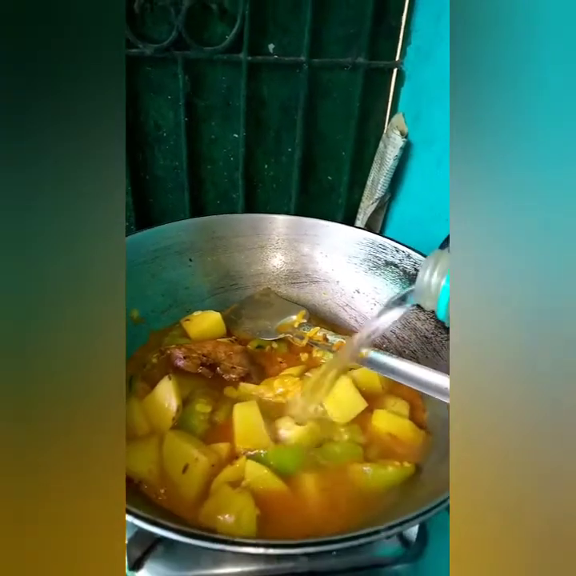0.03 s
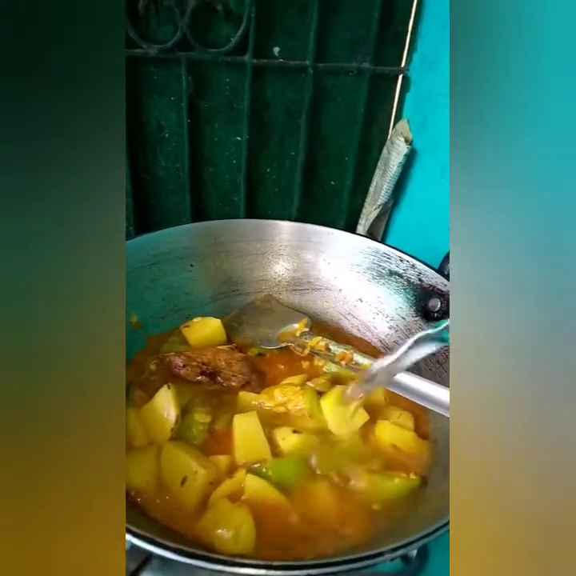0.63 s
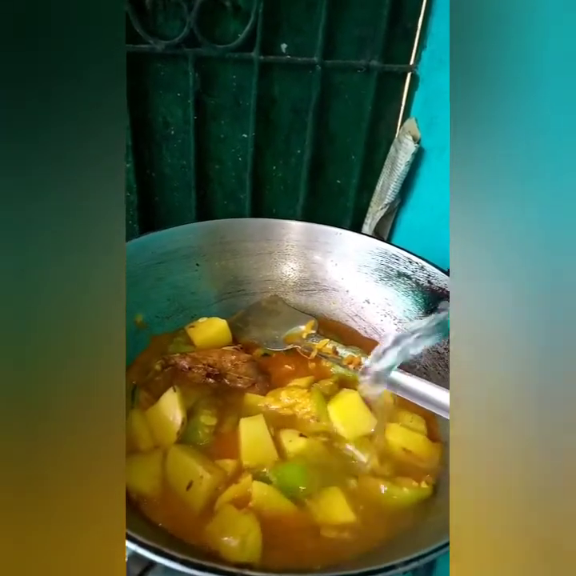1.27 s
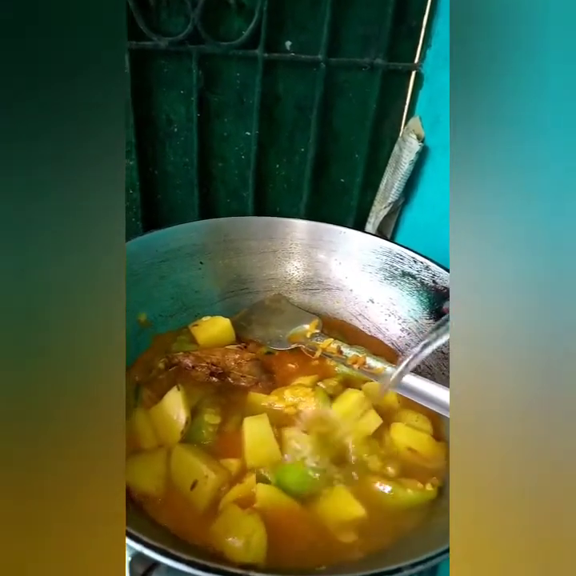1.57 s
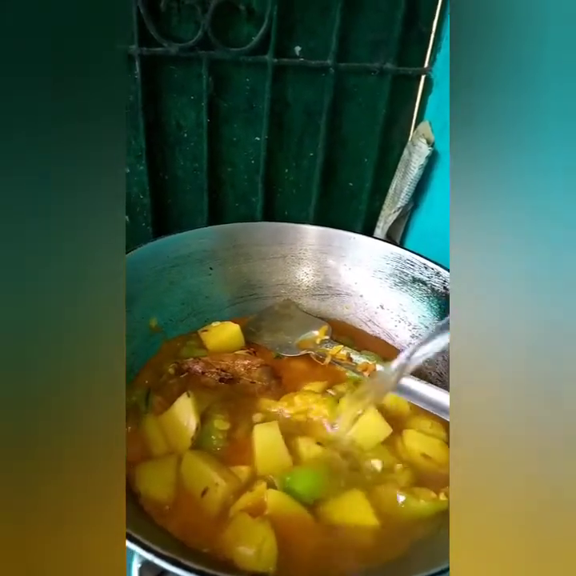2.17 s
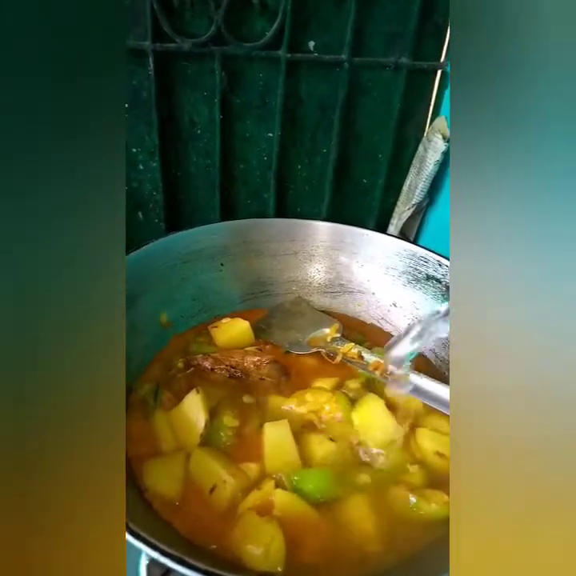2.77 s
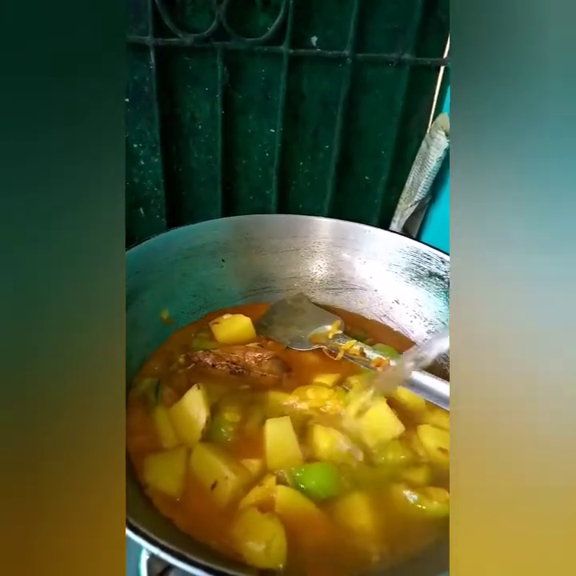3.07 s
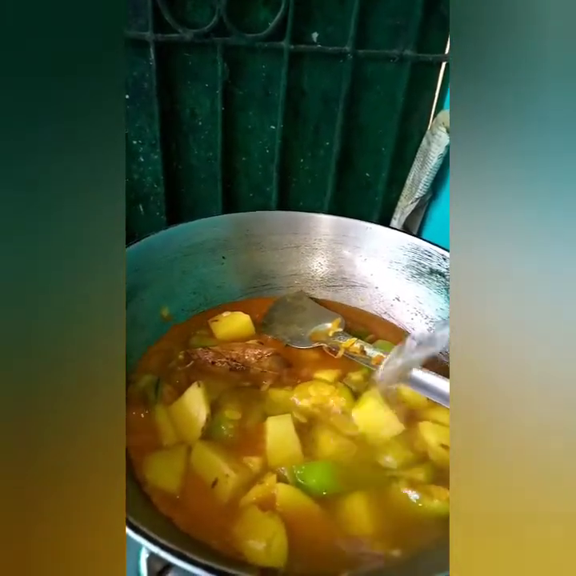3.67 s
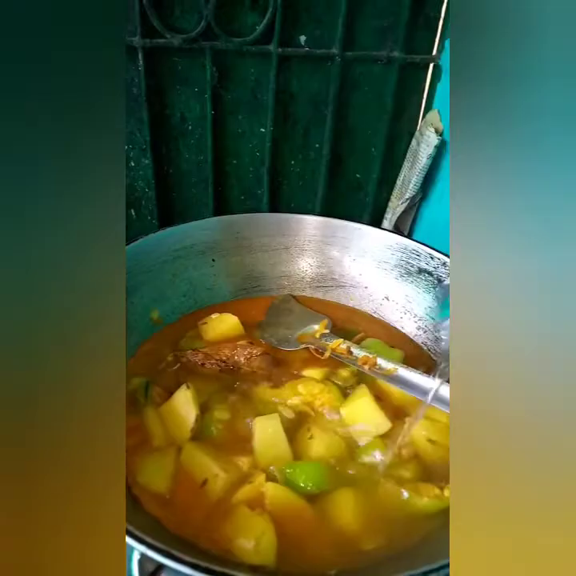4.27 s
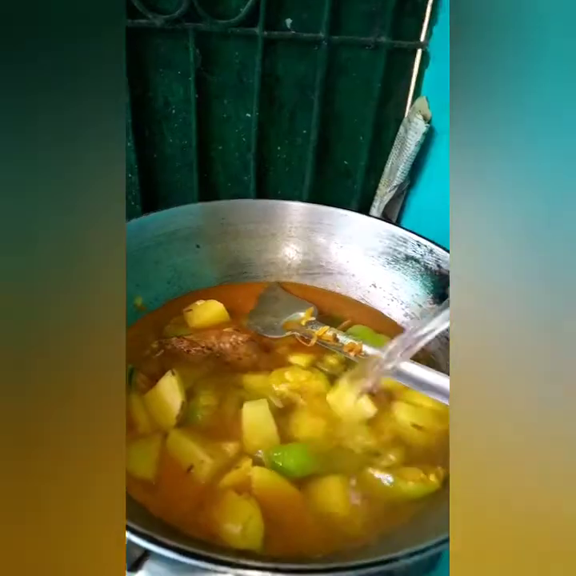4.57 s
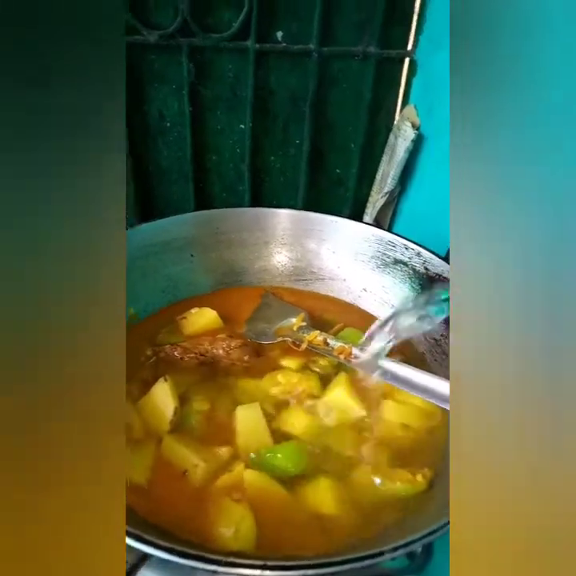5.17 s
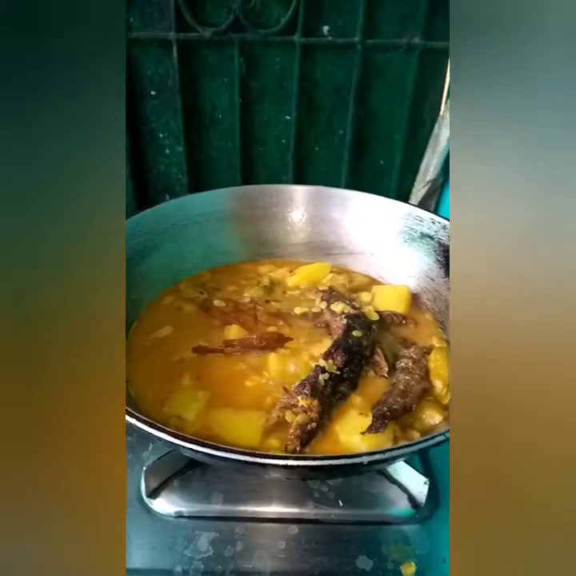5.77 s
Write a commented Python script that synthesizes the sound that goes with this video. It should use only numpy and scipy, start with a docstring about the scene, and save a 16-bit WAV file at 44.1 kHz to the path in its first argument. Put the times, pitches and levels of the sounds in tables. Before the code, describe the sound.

Heard up close in a small kitchen, a stream of water fizzes and churns into hot curry in a wok, with sharp little spits from the metal. The pour turns into a run of bottle glugs, several a second, with bright splashes and plinking bubbles. It stops suddenly, and after a tiny silence the curry bubbles and sizzles softly.

```python
"""A small kitchen, a phone microphone close to a wok of hot curry. Water pours in from a bottle.
From the start the stream churns and fizzes, droplets spit on the hot metal, and each gulp lands as a
splash full of tiny ringing bubbles and fine spray. From 1.7 s the bottle glugs hard. At 5.45 s the
sound cuts off abruptly, then fades back in on the wok simmering quietly."""
import sys
import numpy as np
from scipy import signal
from scipy.fft import rfft, irfft, next_fast_len
from scipy.io import wavfile
from scipy.ndimage import map_coordinates

SR = 44100
rng = np.random.default_rng(int(sys.argv[2]) if len(sys.argv) > 2 else 0)


def inscribe(sig):
    """Save sig as 16-bit PCM at rate SR to the path in sys.argv[1].

    A 1-D sig is mono; a 2-D sig holds one channel per row.
    Samples are clipped to [-1, 1] before scaling.
    """
    pcm = np.round(np.clip(np.atleast_2d(sig).T, -1, 1) * 32767)
    wavfile.write(sys.argv[1], SR, pcm.astype(np.int16))


N = 264715
GLUG_START_S = 1.7  # the bottle starts to glug hard
CUT_S, RESUME_S = 5.45, 5.493  # the silent gap
GLIDE = 0.28  # fractional pitch rise of a short-lived bubble


def amp(db):
    return 10 ** (np.asarray(db) / 20)


def unit(x):
    return x / np.sqrt(np.mean(x ** 2) + 1e-20)


def clock():
    return np.arange(N) / SR


def along(points, hz):
    """Interpolate (Hz, value) points on a log frequency axis."""
    f, v = np.transpose(points)
    return np.interp(np.log(hz + 1), np.log(f + 1), v)


def curves(rows):
    """One value per sample for each column after the time."""
    s, *cols = np.transpose(rows)
    return [np.interp(clock(), s, c) for c in cols]


def wobble(rate):
    """A smooth random curve, rate knots a second."""
    return map_coordinates(rng.standard_normal(int(N * rate / SR) + 4), [clock() * rate])


def around(times, width_s):
    """A soft bump of height 1 around each of the times."""
    t = np.linspace(0, N / SR, 3000)
    bumps = np.exp(-((t[:, None] - times) / width_s) ** 2).sum(1)
    return np.interp(clock(), t, np.minimum(bumps, 1))


def filtered(x, response):
    """x through a complex frequency response."""
    m = next_fast_len(N + SR // 2)
    return irfft(rfft(x, m) * response(np.fft.rfftfreq(m, 1 / SR)), m)[..., :N]


def coloured(x, spectrum, size=2048):
    """Causal filter with the given spectrum, so that attacks stay sharp."""
    cepstrum = irfft(np.log(amp(along(spectrum, np.fft.rfftfreq(size, 1 / SR)))))
    cepstrum[1:size // 2] *= 2
    cepstrum[size // 2 + 1:] = 0
    kernel = irfft(np.exp(rfft(cepstrum)))
    return signal.oaconvolve(x, kernel / np.linalg.norm(kernel))[:N]


def resonator(hz, centre_hz, width_hz):
    """Complex response of one mode."""
    return 1j * hz * width_hz / (centre_hz ** 2 - hz ** 2 + 1j * hz * width_hz)


def bubble(t, hz, life_s, rise):
    """A bubble swells, rings and dies; its pitch rises as it nears the surface."""
    age = t / life_s
    envelope = 1.85 * (1 - np.exp(-4 * age)) * np.exp(-age - .5 * age * age)
    return envelope * np.sin(2 * np.pi * hz * t * (1 + rise * (np.minimum(age, 2) - 1) / 2))


def froth(rate, low_hz, high_hz, cycles, spread_db, hiss_db, size=256):
    """A swarm of bubbles, mostly faint and a few strong, on the hiss of countless finer ones."""
    when, pitch, life, faintness = rng.random((int(rate * N / SR), 4)).T[..., None]
    hz = low_hz * (high_hz / low_hz) ** pitch
    strength = amp(-spread_db * np.log(faintness + .012))
    grains = strength * bubble(np.arange(size) / SR, hz, cycles * (0.38 + life) / hz, rise=0.11)
    where = (when * N).astype(int) + np.arange(size)
    swarm = np.bincount(where.ravel(), grains.ravel(), N)[:N]
    return unit(swarm) + amp(hiss_db) * rng.standard_normal(N)


# The small kitchen's decay. Each row: frequency in Hz, seconds to fall 60 dB.
KITCHEN_DECAY = [(200, 0.8), (3000, 0.2), (14000, 0.36)]

def kitchen(x, early_db, tail_db, reflections=14):
    """The wok's wall and the tiles throw back quick echoes and a short tail, which keep shifting."""
    out, hop = x.copy(), SR // 4
    for start in range(-hop, N, hop):
        hz, t, noise = signal.stft(rng.standard_normal(SR // 4), SR, nperseg=256)
        decay = amp(-60 * t / along(KITCHEN_DECAY, hz)[:, None])
        tail = signal.istft(noise * decay, SR, nperseg=256)[1]
        echo = amp(tail_db) * tail / np.linalg.norm(tail)
        delay_s = rng.uniform(.001, .016, reflections)
        walls = rng.standard_normal(reflections) * np.exp(-delay_s / 0.0045)
        echo[(delay_s * SR).astype(int)] += amp(early_db) * walls / np.linalg.norm(walls)
        span = np.arange(max(start, 0), min(start + 2 * hop, N))
        crossfade = np.sin(np.pi * (span - start) / (2 * hop))
        wet = signal.fftconvolve(x[span] * crossfade, echo)[:N - span[0]]
        out[span[0]:][:len(wet)] += wet
    return out


# Low rumble at the microphone. Each row: time in seconds, level in dB.
RUMBLE_LEVEL = [(0, -90), (2.5, -79.5), (4.0, -81.5), (4.35, -71), (4.7, -78), (6, -78)]

def rumble():
    """A faint low rumble swells once under the pouring."""
    level_db, = curves(RUMBLE_LEVEL)
    band = lambda f: amp(along([(15, -21), (40, -18), (62, -6), (80, -2.5), (140, -43)], f))
    return amp(level_db) * unit(filtered(rng.standard_normal(N), band))


# Tones far down in the background. Each row: start and length in seconds, first and last pitch in Hz,
# relative level in dB.
SINKING_TONES = [(3.95, 0.46, 784, 710, -71), (4.797, 0.45, 938, 832, -73),
                 (4.96, 0.078, 1307, 1286, -68.5)]

def sinking_tones():
    """A few faint, rough tones sink in pitch under the splashing."""
    out = np.zeros(N)
    for s, length, start_hz, end_hz, db in SINKING_TONES:
        progress = np.clip((clock() - s) / length, 0, 1)
        phase = 2 * np.pi * np.cumsum(start_hz + (end_hz - start_hz) * progress) / SR
        swell = np.sqrt(np.abs(np.sin(np.pi * progress)))
        out += amp(db) * swell * (wobble(55) * np.sin(phase) + wobble(55) * np.cos(phase))
    return out


# The simmer fading in, close up. Each row: time in seconds, relative bubbling and sizzle levels in dB.
SIMMER_LEVELS = [(5.5, -85, -76.5), (5.56, -78, -73), (5.61, -70, -71), (5.69, -63, -63.5),
                 (5.8, -69, -64.5), (5.92, -62.5, -61.5), (6.0, -56.5, -64.5)]
# Colours of the bubbling and of the sizzle at the rim. Each row: frequency in Hz, relative gain in dB.
BUBBLING_COLOUR = [(60, -15), (130, -1.5), (190, -2.5), (330, -11), (460, -1), (600, -5.5), (780, 0),
                   (920, -16), (1150, -2), (1400, -10), (1800, 0), (2200, -11), (3200, -61)]
SIZZLE_COLOUR = [(1500, 1.5), (2500, -4), (3700, 2.5), (4800, -2.5), (6250, 7.5), (7000, -7), (8000, -16.5),
                 (10500, -7.5), (12200, -21), (14000, -17), (15400, 3), (16000, -25)]

def simmer():
    """The curry bubbles softly and sizzles unevenly at its rim."""
    bubbling_db, sizzle_db = curves(SIMMER_LEVELS)
    blips = froth(500, 200, 2200, cycles=3, spread_db=1.5, hiss_db=4, size=1024)
    bubbling = amp(bubbling_db - 2) * unit(coloured(blips, BUBBLING_COLOUR))
    crackle = froth(500, 2240, 13500, cycles=5, spread_db=3.6, hiss_db=0)
    sizzle = amp(sizzle_db - 3 + 1.7 * wobble(45)) * unit(coloured(crackle, SIZZLE_COLOUR))
    return kitchen(bubbling + sizzle, early_db=-7.5, tail_db=-5.5)


# Big slow bubbles in the curry. Each row: start in seconds, relative level in dB, pitch in Hz.
CURRY_BUBBLES = [(.99, -47.5, 1240), (1.72, -49.5, 1166), (1.866, -49, 1080), (2.48, -52.5, 1150),
                 (4.652, -52.5, 1123), (5.292, -51.5, 1190)]

def gloops():
    """Now and then a big bubble rings low in the thick curry."""
    out, t = np.zeros(N + SR), np.arange(SR // 16) / SR
    for s, db, hz in CURRY_BUBBLES:
        out[round(s * SR):][:len(t)] += amp(db) * bubble(t, hz, life_s=0.012, rise=0.065)
    return out[:N]


# Modes of the wok's metal. Each row: frequency in Hz, relative gain in dB.
METAL_MODES = [(2451, -12), (2599, 6), (2885, -10), (3246, 8), (3573, -8), (4423, -7), (4582, -28),
               (6220, 3.5), (6399, -11), (7110, 4)]

def wok_ring(x, ring_db, width_hz):
    """The thin wall of the wok adds a faint, narrow ring to every splash."""
    modes = lambda f: sum(amp(db) * resonator(f, hz, width_hz) for hz, db in METAL_MODES)
    return x + amp(ring_db) * filtered(x, modes)


def spit(t, hz, width_hz):
    """One droplet bursts: a tiny ping and a tick, then a short sizzle centred on the same pitch."""
    noise = rng.standard_normal(len(t))
    band = resonator(np.fft.rfftfreq(len(t), 1 / SR), hz, width_hz)
    sizzle = unit(irfft(rfft(noise) * band, len(t))) + 0.46 * rng.standard_normal(len(t))
    ping = amp(-0.5) * bubble(t, hz, life_s=0.0017, rise=0.053)
    tick = amp(-1 - 60 * t / 0.0062) * noise
    return ping + tick + amp(-11.5 - 60 * t / 0.11) * sizzle


# The loudest droplets on the hot metal. Each row: start in seconds, relative level in dB, pitch in Hz.
LOUD_SPITS = [(.7418, -35.5, 9200), (1.0443, -44, 11400), (1.652, -33.5, 9700), (1.721, -40.5, 11540),
              (1.8452, -33, 9360), (2.0956, -31.5, 10030), (2.325, -38, 9300), (3.258, -40, 10900),
              (4.098, -41, 9600), (4.122, -37.5, 11460), (4.3413, -35, 9900), (4.7125, -40.5, 9500),
              (4.7583, -38.5, 9100), (5.1641, -41, 10740)]
# Their colour at close range. Each row: frequency in Hz, relative gain in dB.
SPIT_COLOUR = [(3000, -7), (6500, 10), (8000, -3), (9900, -4.5), (11500, -2), (13000, -3), (15000, 5.5),
               (16200, -34)]

def spits(faint_count=60):
    """Droplets burst on the hot wall: a few loud ones and many faint ones."""
    out, t = np.zeros(N + SR), np.arange(SR // 12) / SR
    faint = rng.uniform([0, -53, 8000], [CUT_S, -43, 13000], (faint_count, 3))
    for s, db, hz in [*LOUD_SPITS, *faint]:
        out[round(s * SR):][:len(t)] += amp(db) * spit(t, hz, width_hz=1100)
    return coloured(out[:N], SPIT_COLOUR)


def lulls(depth_db, lead_s, width_s):
    """Level drop in dB: the bottle swallows air just before each hard gulp, and the stream thins."""
    times = [s - half - lead_s for s, half, *_ in GULP_LANDINGS if s > GLUG_START_S]
    return -depth_db * around(times, width_s)


# The thinning stream. Each row: time in seconds, relative fizz and churn levels in dB.
STREAM_LEVELS = [(0, -51.5, -58), (1.1, -52.5, -58.5), (1.75, -54, -59), (2.6, -56, -60.5),
                 (3.0, -60, -64.5), (3.75, -53.5, -62), (4.15, -61.5, -68), (4.7, -60, -66),
                 (4.95, -60, -68), (5.35, -57, -67.5)]
# Fine spray as the stream wanders. Each row: time in seconds, relative level in dB.
SPRAY_DRIFT = [(0, 0.5), (1.0, -3), (2.0, -1.5), (2.45, 3.5), (2.7, -4.5), (3.15, -1), (3.75, 2),
               (4.45, 1.5), (4.68, -1), (5.05, -5), (5.3, 6.5)]
# Hollow resonances of the filled wok. Each row: centre and width in Hz, relative gain in dB.
HOLLOW_MODES = [(100.6, 34, 3), (188, 28.2, 6), (314, 87, -6.5), (472, 35, 4), (602, 63, -2),
                (778, 58, 3.5), (1137, 182, 2.5), (1940, 540, -0.5)]
# Colours of the fizz and the spray, close up. Each row: frequency in Hz, relative gain in dB.
FIZZ_COLOUR = [(900, -18), (1600, -7.5), (2200, -5.5), (2500, -3), (2800, -2), (3200, -6), (4000, -7),
               (4700, 3), (5500, -2), (6500, 0.5), (7300, -4), (8200, -11.5), (11000, -39)]
SPRAY_COLOUR = [(5000, -41), (7500, -7), (8300, -6), (9700, 0), (11200, -3), (12500, -6), (13800, -13.5),
                (14900, 9.5), (15700, 2), (16200, -31.5)]

def stream():
    """The running stream fizzes, mists and churns the hollow of the wok."""
    fizz_db, churn_db = curves(STREAM_LEVELS)
    drift_db, = curves(SPRAY_DRIFT)
    flutter = wobble(40)  # the stream breaks into uneven lumps
    lull_db = lulls(depth_db=2.5, lead_s=0.069, width_s=0.072)
    foam = froth(1100, 2242, 7150, cycles=6.4, spread_db=2.77, hiss_db=-0.35)
    fizz = amp(fizz_db + lull_db + 1.8 * flutter) * unit(coloured(foam, FIZZ_COLOUR))
    mist_db = -61.5 + .4 * drift_db + 2.2 * lull_db + 1.2 * flutter + 0.89 * wobble(68)
    drops = froth(500, 7000, 16000, cycles=5.3, spread_db=2.9, hiss_db=0.78)
    mist = amp(mist_db) * unit(coloured(drops, SPRAY_COLOUR))
    hollow = lambda f: sum((-1) ** k * amp(db) * resonator(f, hz, width)
                           for k, (hz, width, db) in enumerate(HOLLOW_MODES))
    stir = froth(700, 250, 2000, cycles=2.5, spread_db=1.5, hiss_db=4, size=1024)
    churn = amp(churn_db + 0.78 * lull_db + 1.4 * wobble(21.97)) * unit(filtered(stir, hollow))
    return fizz + mist + churn


def tinkle(between_gulps=0.53):
    """Sparse stray bubbles tick in the stream, louder in a full stream and around each gulp."""
    fizz_db, _ = curves(STREAM_LEVELS)
    near_gulp = around([s + 0.027 for s, *_ in GULP_LANDINGS], width_s=0.063)
    strays = froth(45, 4000, 7000, cycles=4.4, spread_db=2.5, hiss_db=-40)
    gain = amp(fizz_db - 6) * np.maximum(near_gulp, between_gulps)
    return gain * unit(coloured(strays, PLINK_COLOUR))


def trapped_bubbles(over_db, spread_db, low_hz, high_hz, cycles, count=2):
    """Every gulp traps middling bubbles, scattered over its length and louder the harder it lands."""
    out, t = np.zeros(N + SR), np.arange(SR // 50) / SR
    for s, half, bright_db, _ in GULP_LANDINGS:
        for when, pitch, faintness in rng.random((count, 3)):
            hz = low_hz * (high_hz / low_hz) ** pitch
            db = USUAL_GULP_DB + over_db + .6 * (bright_db - USUAL_GULP_DB) - spread_db * faintness
            start = max(0, s + half * (2.6 * when - 1.2))
            out[round(start * SR):][:len(t)] += amp(db) * bubble(t, hz, cycles / hz, GLIDE)
    return coloured(out[:N], PLINK_COLOUR)


# The single bubbles loudest at the microphone. Each row: start in seconds, relative level in dB,
# pitch in Hz, life in cycles.
LOUD_BUBBLES = [(0.059, -25.5, 5104, 9.7), (.739, -30.5, 4798, 7.4), (1.1772, -33, 4930, 11),
                (1.1918, -28, 5120, 12), (1.5941, -29, 5200, 4), (1.8254, -26, 4820, 6.1),
                (1.8396, -21, 4300, 4.3), (2.025, -22, 4900, 9.6), (2.0318, -27, 2760, 8.7),
                (2.0437, -23.5, 6000, 6.6), (2.2287, -34, 2800, 8), (2.256, -15, 4520, 4.8),
                (2.3235, -26.5, 4850, 5.2), (2.4497, -18.5, 4430, 12), (2.4545, -16.5, 3670, 7.4),
                (2.673, -21, 3800, 4.7), (2.7203, -30, 2655, 12), (2.8304, -29, 2880, 5.1),
                (2.939, -25.5, 6240, 6.24), (3.351, -33, 4855, 10), (3.6379, -25.5, 4380, 4.5),
                (3.7646, -30, 2580, 4.9), (3.7767, -21, 5230, 4.4), (3.808, -26.5, 4800, 5),
                (3.9213, -15, 4460, 4.2), (4.2098, -31, 4530, 5), (4.223, -24.5, 4400, 3.8),
                (4.2434, -29.5, 3560, 20), (4.423, -31.5, 4750, 16), (4.6267, -24.5, 4570, 8),
                (4.6332, -25.5, 4440, 11), (4.6428, -28, 2600, 4.4), (5.0588, -24.5, 2670, 10.2),
                (5.0691, -26, 2790, 10.6), (5.278, -23, 2490, 6.9)]
# Colour of ringing bubbles, close up. Each row: frequency in Hz, relative gain in dB.
PLINK_COLOUR = [(1400, -42), (2000, -29), (2450, -0.5), (6500, 3.5), (7500, -5), (10000, 4.5),
                (14000, -8.5)]

def plinks(short_life_s=0.0019):
    """Single large bubbles pinch off and ring for a few cycles; the long-lived ones hardly glide."""
    out, t = np.zeros(N + SR), np.arange(SR // 50) / SR
    for s, db, hz, cycles in LOUD_BUBBLES:
        life_s = cycles / hz
        rise = GLIDE * min(1, (short_life_s / life_s) ** 2)
        out[round(s * SR):][:len(t)] += amp(db - 5.5) * bubble(t, hz, life_s, rise)
    return coloured(out[:N], PLINK_COLOUR)


def landing(s, half_s, rise_power=5.4, tail_power=1.68):
    """Envelope of water that lands fast and dies away more slowly."""
    out = np.zeros(N)
    near = slice(max(0, int((s - 2 * half_s) * SR)), int((s + 10 * half_s) * SR))
    age = (np.arange(N)[near] / SR - s) / half_s
    out[near] = np.exp(-.5 * np.abs(age) ** np.where(age < 0, rise_power, tail_power))
    return out


USUAL_GULP_DB = -47  # bright splash of a middling gulp, on the scale of the rows below
# Gulps landing in the curry, close to the microphone. Each row: peak time and half length in seconds,
# relative levels of the bright and the deep splash in dB.
GULP_LANDINGS = [(0.019, 0.034, -54, -54), (0.502, 0.0093, -47, -48.5), (.738, 0.0071, -51, -47),
                 (0.954, 0.022, -50.5, -58), (1.183, .0092, -52, -48.5), (1.343, 0.0088, -47, -69),
                 (1.394, 0.013, -53, -50.5), (1.47, 0.012, -53, -58), (1.606, 0.0084, -51, -56),
                 (1.834, 0.023, -44, -57), (2.043, 0.013, -42.5, -45.5), (2.257, 0.012, -38.5, -43.5),
                 (2.454, 0.015, -38.5, -56), (2.692, 0.021, -49.5, -47.5), (2.883, .027, -45.5, -47),
                 (2.941, 0.018, -48, -71), (3.107, 0.032, -47, -54.5), (3.319, 0.024, -45, -57.5),
                 (3.387, 0.019, -52.5, -60), (3.537, 0.029, -49.5, -56.5), (3.778, 0.016, -43.5, -49),
                 (3.989, .017, -44.5, -47.5), (4.223, 0.023, -44, -56), (4.438, .015, -45, -53.5),
                 (4.657, 0.018, -41.5, -39), (4.85, 0.022, -50, -50), (5.075, .014, -44.5, -46.5),
                 (5.292, .012, -53, -47.5)]
# The low slosh under the gulps. Each row: time in seconds, relative level in dB.
SLOSH_LEVEL = [(0, -63.5), (2.5, -62), (4.1, -61), (4.44, -51.5), (4.66, -54.5), (4.9, -68), (5.4, -58)]

def gulps():
    """Envelopes of deep splash, bright splash, spray and slosh: a harder gulp throws more spray."""
    s, half, bright_db, deep_db = np.transpose(GULP_LANDINGS)
    spray_db = -55 + 0.54 * (bright_db - USUAL_GULP_DB)
    slosh_db = np.interp(s, *np.transpose(SLOSH_LEVEL))
    landings = np.array([landing(*gulp) for gulp in zip(s, half)])
    power = amp([deep_db, bright_db, spray_db, slosh_db]) ** 2 @ landings ** 2
    # once the bottle glugs hard, thrown drops rain back 79 ms after each gulp
    rain = sum(landing(at + 0.079, half_s=0.0099) ** 2 for at in s[s > GLUG_START_S])
    power[1:3] += np.outer(amp([-58, -65.5]) ** 2, rain)  # into the bright splash and the spray
    return np.sqrt(power)


# Colours of the deep splash, bright splash and slosh. Each row: frequency in Hz, relative gain in dB.
DEEP_COLOUR = [(1000, -19), (1500, -21.5), (1850, -10.5), (2150, -19), (2480, 5), (2750, -1.5), (3100, -7),
               (3600, -19), (5000, -55)]
BRIGHT_COLOUR = [(2000, -36), (2800, -6), (3500, -6), (4000, -6), (4600, 2), (5500, -6), (6500, -1),
                 (7400, -5.5), (8300, -27), (11000, -22)]
SLOSH_COLOUR = [(45, -24.5), (105, 7), (150, -6.5), (200, -0.5), (300, -2), (380, 2.5), (460, 0.5),
                (620, -9), (950, -21), (1160, -3.5), (1400, -20.5), (2200, -20.5)]

def splashes():
    """Each gulp shoves the curry aside, traps large and small bubbles and throws up spray."""
    deep_gain, bright_gain, spray_gain, slosh_gain = gulps()
    drift_db, = curves(SPRAY_DRIFT)
    large = froth(900, 1700, 3500, cycles=3.26, spread_db=1.3, hiss_db=1)
    small = froth(1100, 3310, 7440, cycles=6, spread_db=6, hiss_db=0.5)
    drops = froth(1300, 6850, 17700, cycles=2.8, spread_db=1.9, hiss_db=-7.5)
    deep = deep_gain * unit(coloured(large, DEEP_COLOUR))
    bright = bright_gain * unit(coloured(small, BRIGHT_COLOUR))
    spray = amp(drift_db) * spray_gain * unit(coloured(drops, SPRAY_COLOUR))
    slosh = amp(-0.5) * slosh_gain * unit(coloured(rng.standard_normal(N), SLOSH_COLOUR))
    return deep + bright + spray + slosh


def scene():
    """Beside the wok: pouring, a short silence, simmering. Only the spitting droplets spread in stereo."""
    t, droplets = clock(), spits()
    bubbles = plinks() + tinkle()
    bubbles += trapped_bubbles(over_db=8.5, spread_db=8.5, low_hz=2720, high_hz=7150, cycles=7.5)
    water = wok_ring(stream() + splashes() + bubbles + droplets, ring_db=-10.5, width_hz=20)
    pouring = kitchen(water + gloops() + sinking_tones(), early_db=-8, tail_db=-10.5)
    mid = (amp(-1) * pouring + rumble()) * (t < CUT_S) + simmer() * (t > RESUME_S)
    side_colour, delay_s = [(2500, -55), (5000, -43), (8000, -26.5)], .004
    side = filtered(droplets, lambda f: amp(along(side_colour, f)) * np.exp(-2j * np.pi * f * delay_s))
    return np.array([mid + side, mid - side])


def record(dry, top_hz=15950):
    """The phone keeps nothing above its band limit."""
    return filtered(dry, lambda hz: hz < top_hz)


dry = scene()
out = record(dry)
inscribe(out)
```